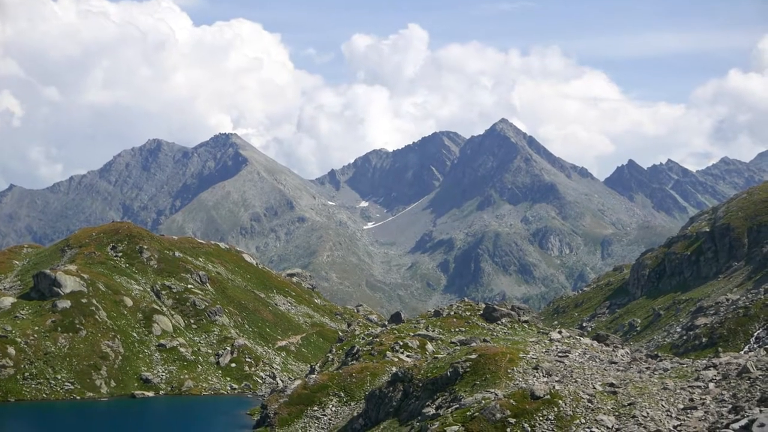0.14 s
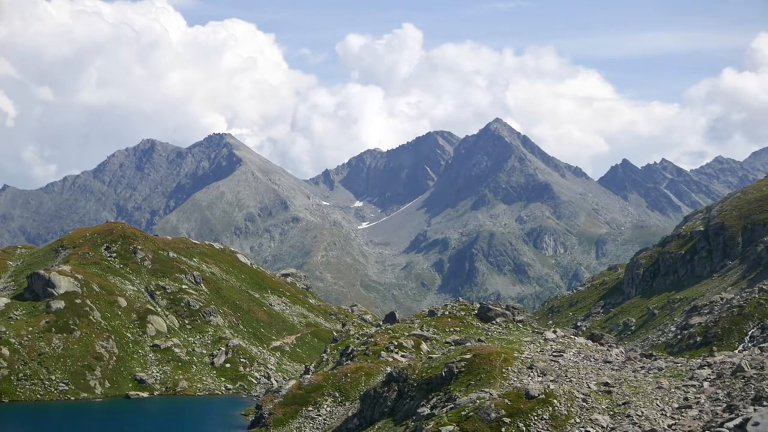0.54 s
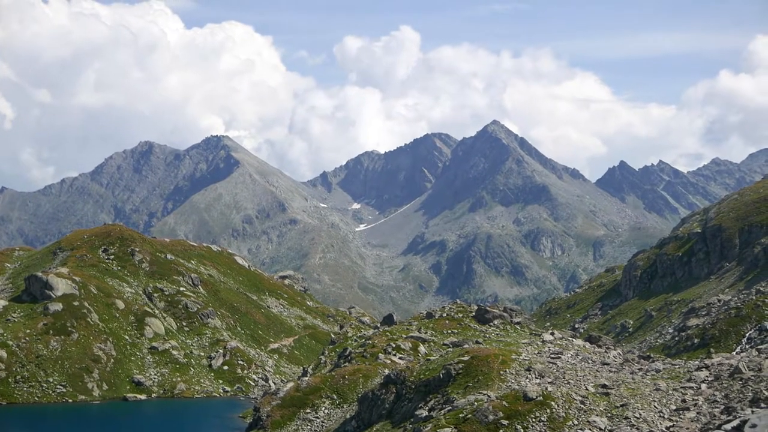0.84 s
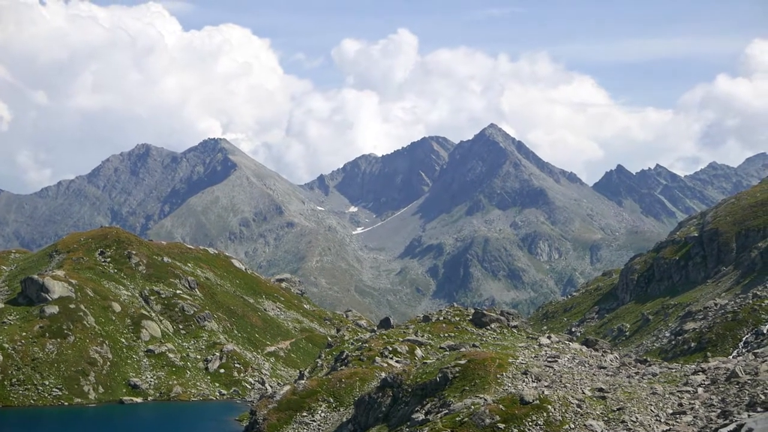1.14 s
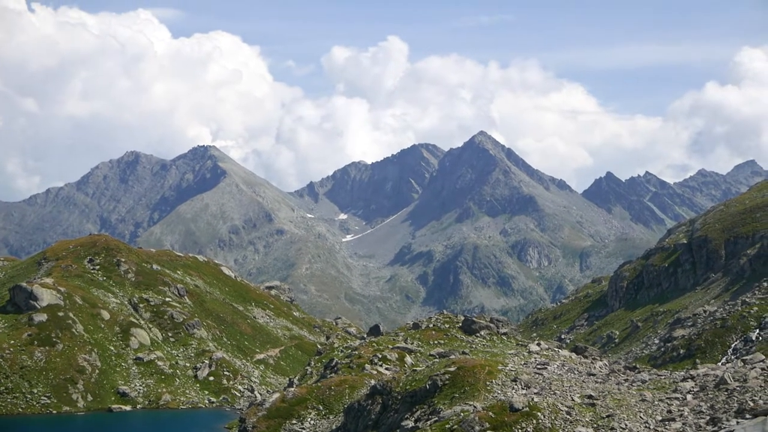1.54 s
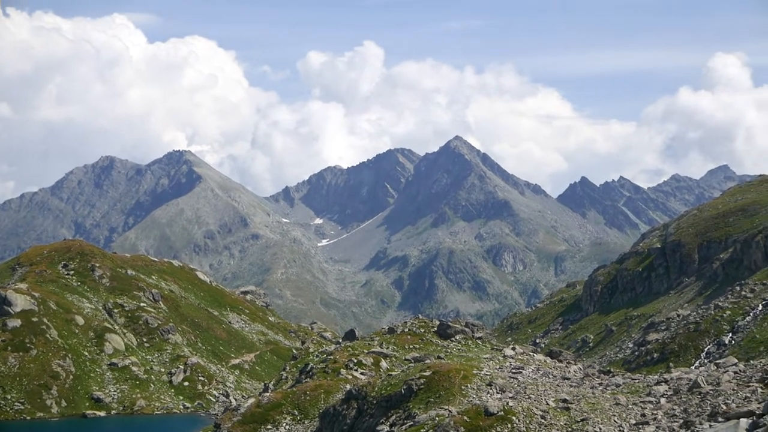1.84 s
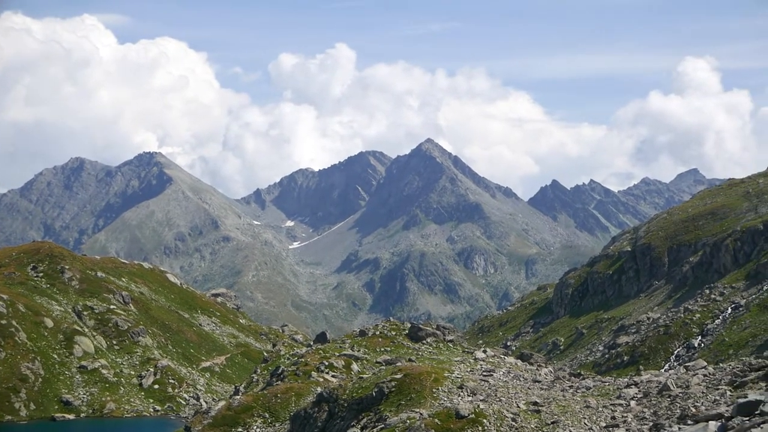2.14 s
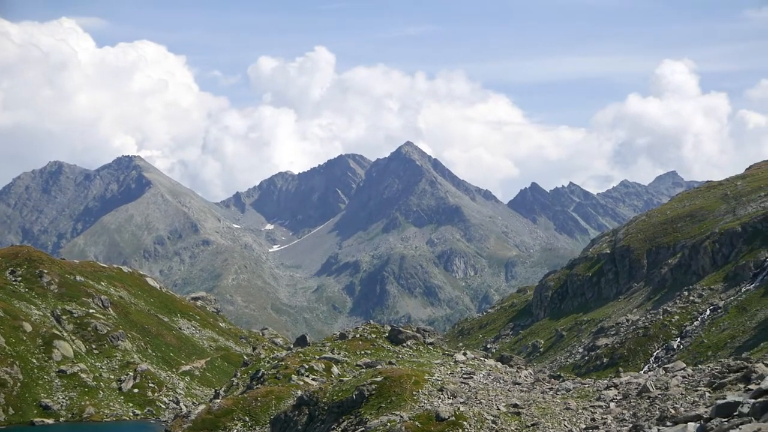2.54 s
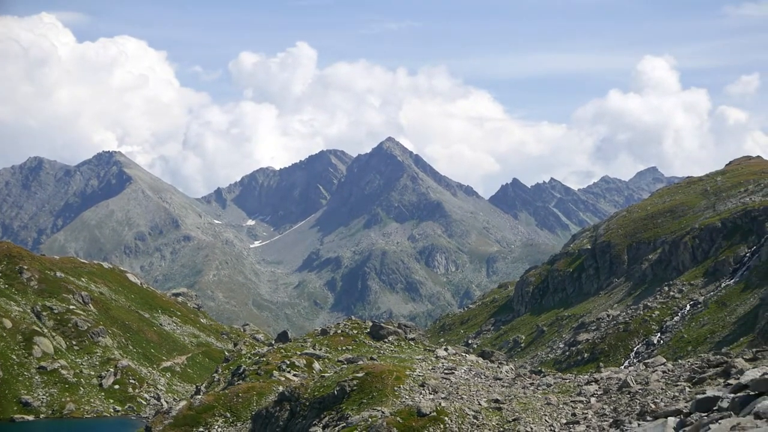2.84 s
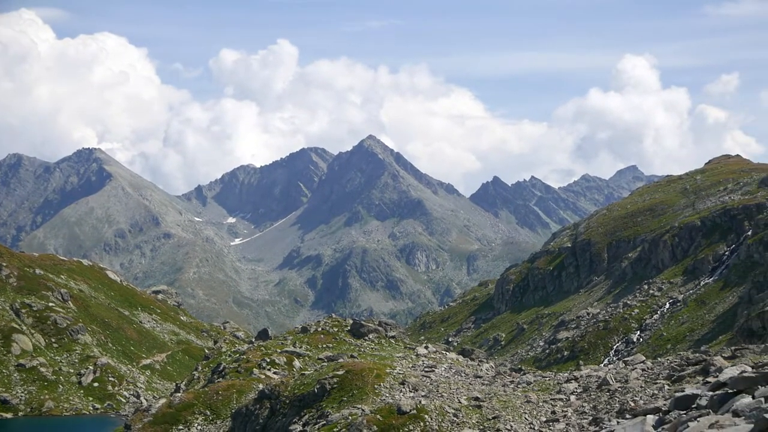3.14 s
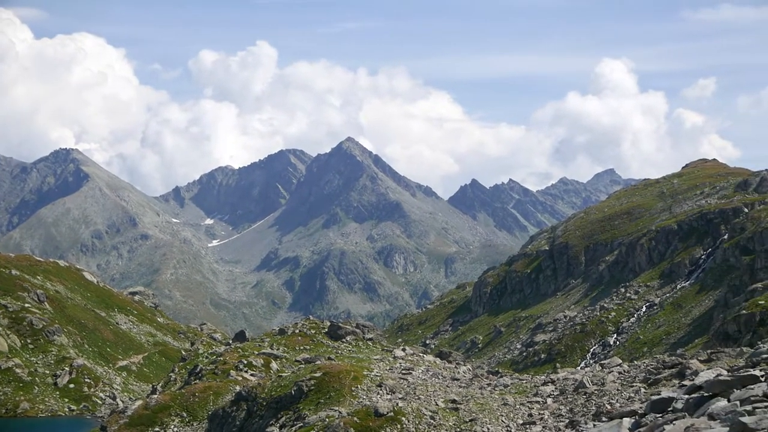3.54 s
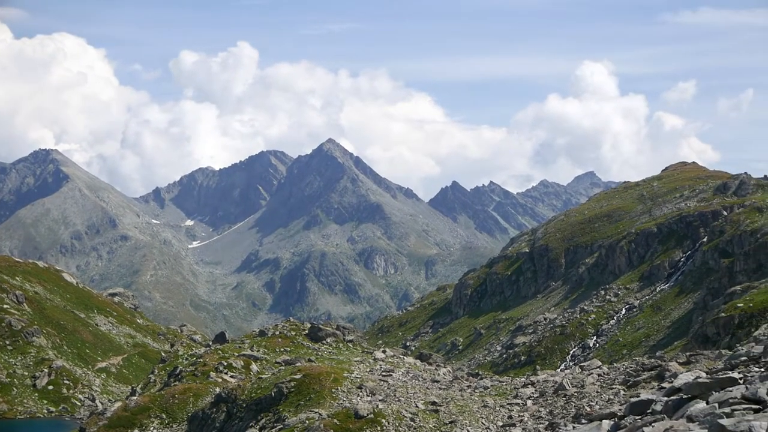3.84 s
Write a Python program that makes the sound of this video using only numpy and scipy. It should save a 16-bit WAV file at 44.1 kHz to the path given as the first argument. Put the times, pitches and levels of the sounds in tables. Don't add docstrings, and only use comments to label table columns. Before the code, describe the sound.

Wind buffets a handheld camera's stereo microphones in dull low thumps, sparse and faint at first, strong after about 1.4 seconds, over a quiet distant wind-and-water hush, fine hiss and tiny early mechanical ticks.

```python
import sys
import numpy as np
from scipy import signal
from scipy.fft import rfft, irfft
from scipy.io import wavfile
from scipy.ndimage import uniform_filter1d

SR = 44100
rng = np.random.default_rng(int(sys.argv[2]) if len(sys.argv) > 2 else 0)


def level_to_linear(level):
    exponent = np.asarray(level, float) / 20
    return 10 ** exponent


def unload_wav(signal):
    wavfile.write(
        sys.argv[1],
        SR,
        np.round(np.clip(np.atleast_2d(signal).T, -1, 1) * 32767).astype(np.int16),
    )


N = 176400

# f/Hz, level/dB per Hz
AIR_COLOUR = [(40, -27), (120, -17), (280, 0.5), (700, -1), (1500, -7.5), (2050, -15.5), (2650, -15.5),
              (4500, -31)]
# t/s, level/dB
AIR_LEVEL = [(0, -51), (1.2, -48.5), (2.2, -48), (4, -49)]
# f/Hz, level/dB
AIR_WIDTH = [(60, -3), (200, -11), (400, -11), (520, -2), (1300, 0), (2400, -1)]
# f/Hz, level/dB
AIR_BALANCE = [(200, -1), (700, -4), (1300, 2.5), (2400, 6), (6000, 1)]
# f/Hz, level/dB per Hz
HISS_COLOUR = [(500, 15), (4000, 3.5), (6500, 5), (9500, 5.5), (13000, 0.5), (15700, -18)]

# t/s, peak level/dB, low body against it/dB
LENS_TICKS = [(0.1035, -41, -1), (0.2239, -49, -2), (0.265, -42, 2), (0.383, -47, 5), (0.4265, -46, 2),
              (0.5848, -43.5, -5), (0.665, -49, -2), (0.703, -40.5, 0.5), (0.712, -52, -5),
              (0.9027, -45, 1), (0.9825, -42, 3.5), (0.998, -55, -3), (1.024, -45, 3), (1.0645, -51, -3),
              (1.104, -41, -5), (1.1847, -46, -2), (1.225, -44, 1), (1.3043, -48, 0), (1.386, -44, -4),
              (1.5843, -47.5, 5), (1.6606, -48, -2), (1.712, -52, -2), (1.7827, -43, -5),
              (1.9038, -43, -11), (2.1632, -45, -2)]
# f/Hz, length/ms, level/dB
TICK_RINGS = [(2600, .9, -1), (3300, .4, -6), (3950, .5, -3), (4500, .45, -5), (5300, .45, -6)]

# t/s, peak level/dB, f/Hz, length/ms
LEFT_EDDIES = [(0.108, -27.5, 203, 7), (0.228, -31.5, 208, 13), (0.253, -36.5, 183, 19),
               (0.354, -31, 174, 11.5), (1.264, -34.5, 195, 20), (1.396, -10.5, 260, 7.6),
               (1.45, -30.5, 208, 20), (1.465, -18.5, 317, 4.1), (1.501, -25, 218, 18),
               (1.52, -20.5, 261, 4.3), (1.554, -21.5, 310, 8.3), (1.757, -20.5, 236, 6.8),
               (1.844, -27, 166, 9.1), (1.971, -26, 190, 5.8), (2.073, -23.5, 172, 11),
               (2.304, -29.5, 224, 9.2), (2.372, -23.5, 192, 3), (2.414, -27, 224, 4.9),
               (2.661, -25.5, 189, 10), (2.689, -16.5, 208, 10), (3.004, -23, 211, 18),
               (3.043, -28.5, 204, 19), (3.249, -20.5, 249, 17), (3.303, -16.5, 211, 5.7),
               (3.434, -26, 280, 5.3), (3.597, -31.5, 183, 18), (3.729, -16.5, 216, 9.5),
               (3.784, -16, 205, 7.4), (3.806, -17.5, 170, 6.1), (3.84, -25, 198.6, 44)]
# t/s, peak level/dB, f/Hz, length/ms
RIGHT_EDDIES = [(0.236, -38, 204, 15), (0.3, -39.5, 140, 33), (0.375, -40, 131, 14), (1.421, -22, 248, 9.2),
                (1.449, -15.5, 170, 5), (1.654, -32, 192, 18), (1.868, -26.5, 199, 7.4),
                (1.914, -29.5, 203, 22), (1.938, -19.5, 181, 5.1), (1.985, -33.5, 170, 27),
                (2.148, -34.5, 168, 32), (2.307, -32.5, 297, 15.6), (2.38, -29.5, 177, 5.3),
                (2.474, -26, 188, 9.5), (2.537, -25, 151, 31), (2.593, -24.5, 240, 6.1),
                (2.612, -27, 202, 7.9), (2.702, -28, 204, 12), (2.72, -33.5, 151, 20),
                (2.791, -22, 167, 10.6), (2.838, -29.5, 168, 30), (3.021, -26.5, 150, 8.3),
                (3.058, -33.5, 200, 7), (3.192, -27.5, 212, 5.7), (3.256, -16.5, 202, 5.7),
                (3.476, -12.5, 193, 7.6), (3.539, -17.5, 260, 9.8), (3.548, -12, 307, 7.2),
                (3.602, -26, 260, 10.5), (3.794, -23, 164, 38), (3.81, -19, 215, 18)]
# t/s, peak level/dB, f/Hz
LEFT_PUFFS = [(0.365, -33, 212), (0.378, -34, 186.0), (1.372, -32.0, 188.0), (1.409, -28, 197),
              (1.426, -27, 244), (1.537, -30.5, 246.0), (1.564, -28, 197), (1.634, -33.5, 182.0),
              (1.773, -32, 190), (1.799, -31, 214), (1.893, -32, 182.0), (2.144, -30, 168.0),
              (2.391, -30, 184), (2.602, -33, 164.0), (2.677, -32, 257), (2.83, -33, 250),
              (2.851, -31.5, 196.0), (2.93, -33.5, 167), (2.942, -36, 176), (3.234, -25, 268),
              (3.274, -30, 185.0), (3.444, -33, 271.0), (3.464, -26, 179), (3.476, -25.5, 202),
              (3.519, -35, 197.0), (3.528, -29, 215.0), (3.706, -29.5, 200), (3.758, -34.0, 220.0),
              (3.865, -33, 211), (3.904, -30.5, 215)]
# t/s, peak level/dB, f/Hz
RIGHT_PUFFS = [(1.481, -32, 200), (1.496, -31, 145.0), (1.556, -33, 143.0), (1.667, -32.0, 192),
               (1.705, -35.0, 190.0), (2.089, -30.5, 138.0), (2.136, -38, 160.0), (2.227, -33, 192.0),
               (2.393, -28.5, 212.0), (2.407, -33, 202), (2.426, -36, 203.0), (2.46, -32.0, 166),
               (2.491, -33, 241.0), (2.576, -38, 196.0), (2.623, -31.5, 203.0), (2.77, -31.5, 170.0),
               (2.809, -40, 169.0), (3.115, -37, 197.0), (3.133, -37.0, 172.0), (3.163, -33, 168.0),
               (3.182, -27.5, 173), (3.203, -33, 170), (3.281, -31.5, 224.0), (3.445, -31, 213),
               (3.492, -31.0, 173.0), (3.573, -44, 154.0), (3.582, -37.0, 163.0), (3.615, -41, 161),
               (3.823, -20, 218), (3.841, -31, 177.0)]
# t/s, level/dB
GUST = [(0, -66), (.38, -57), (.43, -73), (.56, -71), (.6, -83), (1.2, -79.5), (1.36, -64), (1.8, -55),
        (2.05, -59), (2.5, -52), (2.9, -60), (3.4, -58.5), (3.65, -58.5), (4, -60)]

# t/s, peak level/dB, length/ms, bright crack/dB, rattle after/dB
FINGER_CLICKS = [
    (0.2867, -39.5, 0.51, -6.5, -28),
    (3.2186, -36.5, 0.41, -21, -35),
]
# f/Hz, length/ms, level/dB
CLICK_RINGS = [(1900, .4, -12), (3700, .3, -11), (4700, 0.35, -13), (6000, 0.3, -16)]
# f/Hz, length/ms, level/dB
CRACK_RINGS = [(3300, .6, -4), (5000, .6, -1), (6600, .25, -8), (8900, .4, -7), (11000, .2, -14),
               (13300, .25, -8)]
# f/Hz, width/Hz, level/dB
RATTLE_MODES = [(2580, 490, 18), (4940, 2400, -33)]

# t/s, peak level/dB, f/Hz, port (0 left, 1 right)
SNAPS = [
    (1.394, -23, 560, 0),
    (3.476, -28, 600, 1),
    (3.778, -31, 600, 0),
]
# f/Hz, width/Hz, depth (0-1)
MOTOR_NOTCHES = [(472, 81, 1), (6590, 100, 0.4), (7400, 450, .92), (7680, 400, 0.85), (8500, 600, 0.55)]


def curve(table, x):
    at, value = np.transpose(table)
    return np.interp(x, at, value)


def colour(x, table):
    hz = np.arange(N // 2 + 1) * SR / N + 1
    points_hz, points_db = np.array(table, float).T
    gain_db = np.interp(np.log(hz), np.log(points_hz), points_db)
    return irfft(rfft(x) * level_to_linear(gain_db), N)


def level(x, db):
    return x * level_to_linear(db) / np.sqrt(np.mean(x ** 2))


def band(x, hz, width_hz):
    return signal.lfilter(*signal.iirpeak(hz, hz / width_hz, fs=SR), x)


def walk(rate_hz):
    k = int(SR / rate_hz)
    steps = np.repeat(rng.standard_normal(N // k + 1), k)
    return 1.16 * uniform_filter1d(uniform_filter1d(steps, k), k)[:N]


def thumps(times, gains, hz, sigma_s, phase):
    offset = np.arange(-1300, 1300)
    t = offset / SR
    bell = np.exp(-.5 * (t / sigma_s[:, None]) ** 2)
    swing = gains[:, None] * bell * np.cos(2 * np.pi * hz[:, None] * t + phase[:, None])
    at = np.clip((times * SR).astype(int)[:, None] + offset, 0, N)
    return np.bincount(at.ravel(), swing.ravel(), N + 1)[:N]


def ring(times, dbs, modes):
    out = np.zeros(N)
    for hz, ms, db in modes:
        detune, phase, stagger, uneven = rng.random((4, len(times)))
        start = times + ms * (stagger - .5) / 1000
        gain = level_to_linear(dbs + db + 5.3 * (uneven - 0.44))
        out += thumps(start, gain, hz * (0.97 + 0.08 * detune), ms / 1000 + 0 * times, 2 * np.pi * phase)
    return out


def air():
    swell_db, flicker_db = .35, .8
    mid, side = rng.standard_normal((2, N))
    mid = colour(mid, AIR_COLOUR)
    side = colour(colour(side, AIR_COLOUR), AIR_WIDTH)
    left = colour(mid + side, [(f, d / 2) for f, d in AIR_BALANCE])
    right = colour(mid - side, [(f, -d / 2) for f, d in AIR_BALANCE])

    spec = rfft(np.array([left, right]))
    hz = np.arange(N // 2 + 1) * SR / N + 1
    swell = walk(1.84)
    out = 0
    for k in range(20):
        part = np.clip(1 - np.abs(2 * np.log2(hz / 25) - k), 0, 1)
        out = out + irfft(spec * part, N) * level_to_linear(swell_db * swell + flicker_db * walk(9))
    return level(out, 0) * level_to_linear(curve(AIR_LEVEL, np.arange(N) / SR))


def hiss():
    whistle = level_to_linear(-88) * np.sin(2 * np.pi * 15625 * np.arange(N) / SR)
    noise = level(colour(rng.standard_normal((2, N)), HISS_COLOUR), -65.5)
    return noise * level_to_linear(0.5 * walk(24.23)) + whistle


def lens_ticks():
    tick_db, left_db = -9, 3
    s, db, body_db = np.array(LENS_TICKS).T
    body = ring(s + 0.00226, db + body_db + tick_db, TICK_RINGS[:1])
    tick = ring(s + 0.0018, db + tick_db, TICK_RINGS[1:])
    return (body + tick) * level_to_linear(left_db * np.array([[.5], [-.5]]))


def big_eddies(s, db, hz, width_s):
    phase = 2 * np.pi * rng.random((3, len(s)))
    swing = thumps(s, level_to_linear(db + 3), hz, width_s, phase[0])
    swell = thumps(s, level_to_linear(db - 9.5), 0.56 * hz, 1.4 * width_s, phase[1])
    edge = thumps(s, level_to_linear(db - 10), np.minimum(1.76 * hz, 402), 0.98 * width_s, phase[2])
    return swing + swell + edge


def small_eddies(s, db, width_s):
    per_s, gust_db, scatter_db = 170, 6, 10
    centre_hz, spread_oct, length_ms = 170, 0.53, 4.15
    wake_db, wake_follows, before_s, after_s = -20.5, 0.54, 0.011, 0.012
    count = per_s * N // SR
    jitter, length, phase = rng.random((3, count))
    scatter, tune = rng.standard_normal((2, count))
    t = (np.arange(count) + jitter) / per_s

    lag = t[:, None] - s
    wake = level_to_linear(wake_follows * db + wake_db) * np.exp(-np.abs(lag) / np.where(lag < 0, before_s, after_s))
    wake = wake * (1 - np.exp(-(lag / width_s / 2) ** 2))
    size = np.sqrt(level_to_linear(curve(GUST, t) + gust_db) ** 2 + (wake ** 2).sum(axis=1))
    size = size * level_to_linear(scatter_db * np.minimum(scatter, 1))
    pitch = centre_hz * 2 ** (spread_oct * np.clip(tune, -1.2, 1.5))
    sigma_s = length_ms / 1000 * (0.52 + 0.8 * length) * centre_hz / pitch
    return thumps(t, size, pitch, sigma_s, 2 * np.pi * phase)


def port(eddies, puffs):
    puff_ms = 10.8
    s, db, hz, ms = np.array(eddies + [(*p, puff_ms) for p in puffs], float).T
    width_s = 0.25 * ms / 1000
    return big_eddies(s, db, hz, width_s) + small_eddies(s, db, width_s)


def rattle(times, dbs, ms):
    t = np.arange(N) / SR
    env = sum(level_to_linear(d) * np.exp(-.5 * ((t - s) * 1000 / ms) ** 2) for s, d in zip(times, dbs))
    scrape = env * np.sign(rng.standard_normal(N))
    return 4 * sum(level_to_linear(d) * band(scrape, hz, width_hz) for hz, width_hz, d in RATTLE_MODES)


def finger_clicks():
    body_hz, ring_width_hz, crack_lead_s, rattle_s = 2820, 260, 0.0018, 0.0098
    s, db, ms, crack_db, rattle_db = np.array(FINGER_CLICKS).T
    crack = ring(s - crack_lead_s, db + crack_db, CRACK_RINGS)
    body = thumps(s, level_to_linear(db), body_hz + 0 * s, ms / 1000, 0 * s)
    body = body + band(body, body_hz, ring_width_hz) + ring(s, db, CLICK_RINGS)
    return crack + body + rattle(s + rattle_s, db + rattle_db, rattle_s * 700)


def snaps():
    s, db, hz, side = np.array(SNAPS, float).T
    sigma_s = 1.1 / 1000 + 0 * s
    phase = 2 * np.pi * rng.random(len(s))
    return np.array([thumps(s, level_to_linear(db) * (side == k), hz, sigma_s, phase) for k in range(2)])


def scene():
    wind = np.array([port(LEFT_EDDIES, LEFT_PUFFS), port(RIGHT_EDDIES, RIGHT_PUFFS)])
    return air() + hiss() + lens_ticks() + wind + finger_clicks() + snaps()


def low_pass(x):
    return signal.sosfilt(signal.butter(12, 15850, fs=SR, output="sos"), x)


def record(dry):
    x = dry + 0.2 * dry[::-1]
    x = signal.sosfilt(signal.butter(4, 86, "high", fs=SR, output="sos"), x)
    x = x + level(colour(rng.standard_normal((2, N)), [(40, -4), (300, -43)]), -79)
    for hz, width_hz, depth in MOTOR_NOTCHES:
        x = x - depth * band(x, hz, width_hz)
    x = signal.sosfilt(signal.ellip(12, .3, 70, 15640, fs=SR, output="sos"), x)
    return low_pass(x)


dry = scene()
out = record(dry)
unload_wav(out)
```